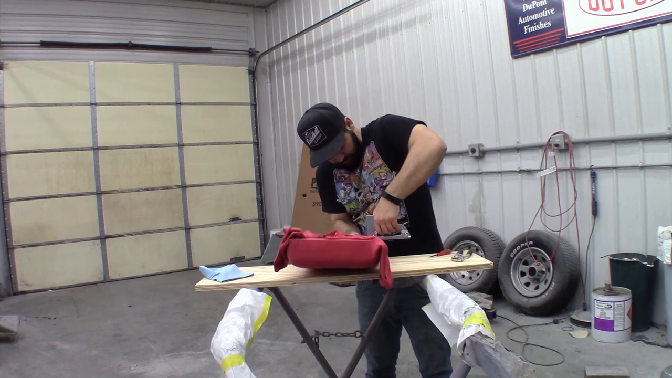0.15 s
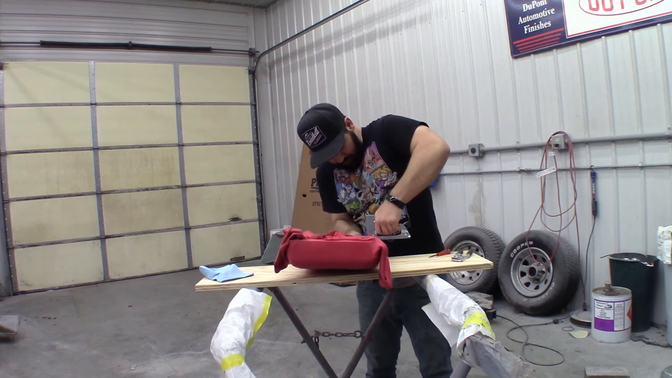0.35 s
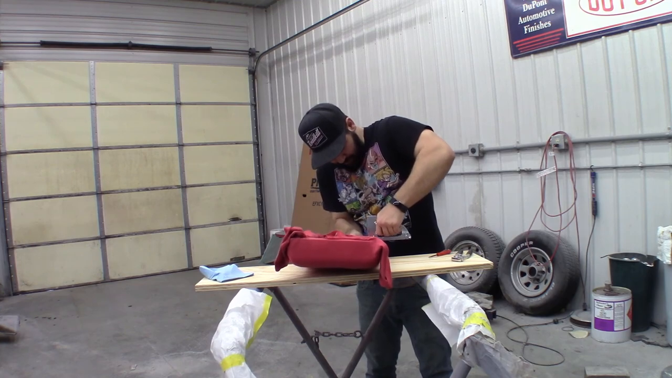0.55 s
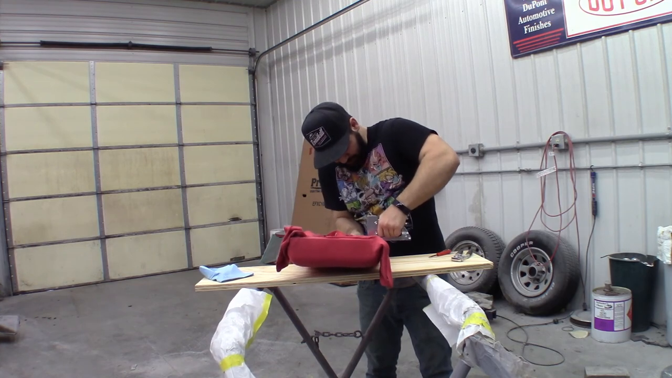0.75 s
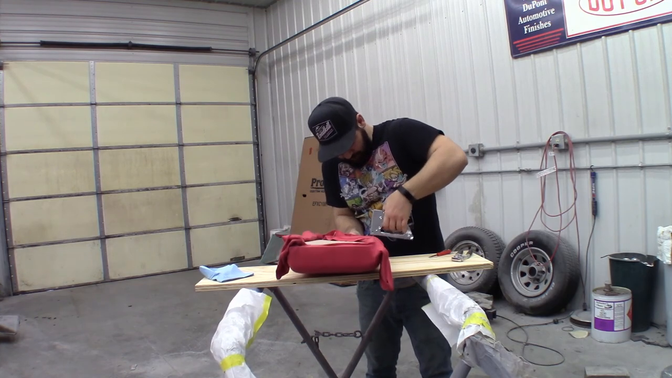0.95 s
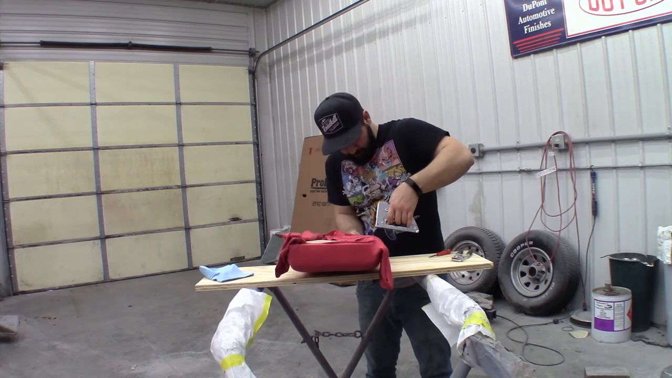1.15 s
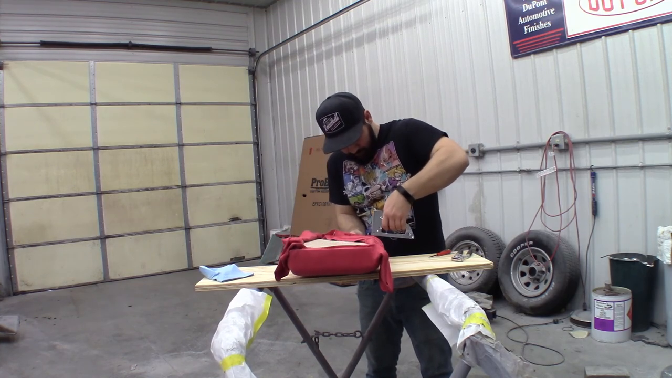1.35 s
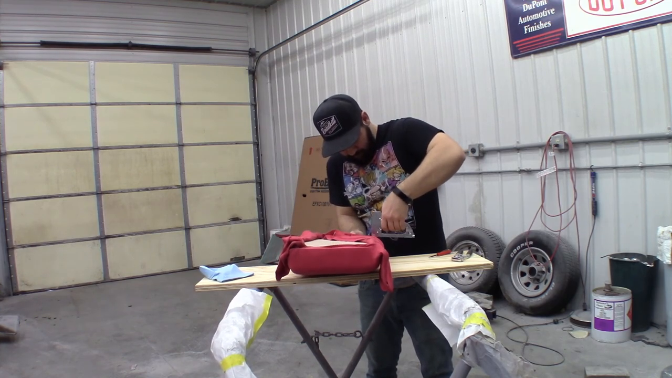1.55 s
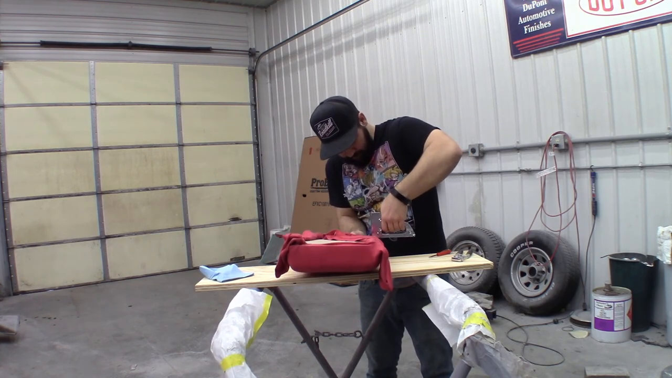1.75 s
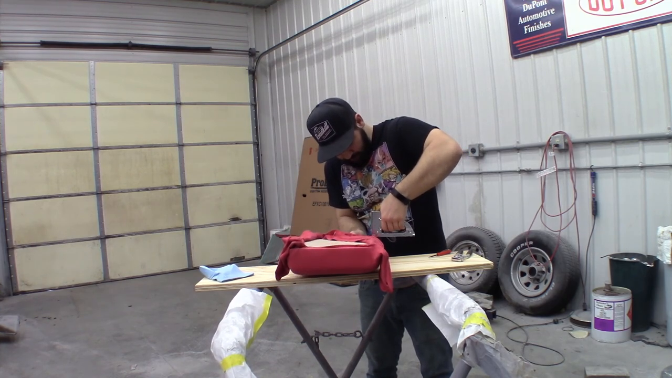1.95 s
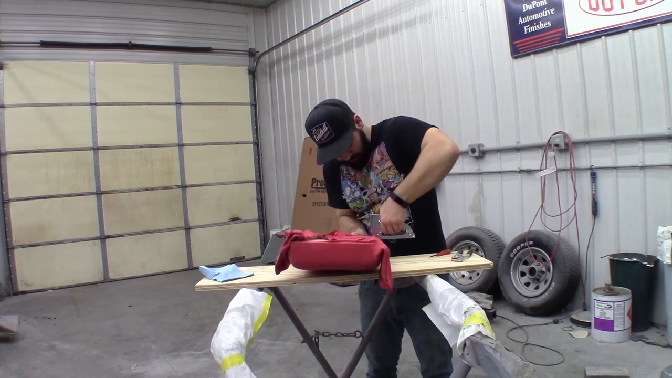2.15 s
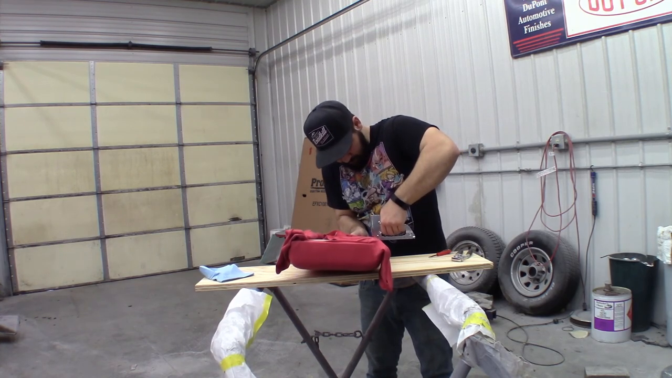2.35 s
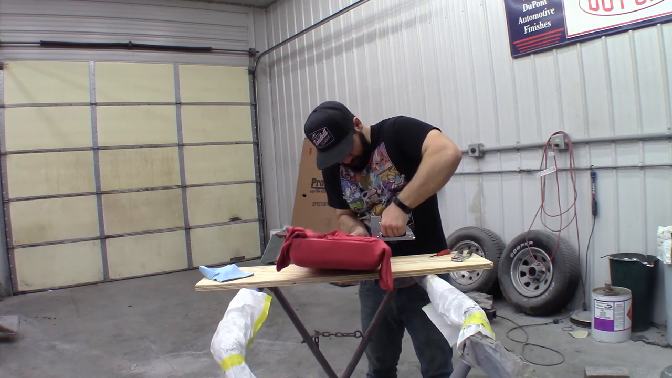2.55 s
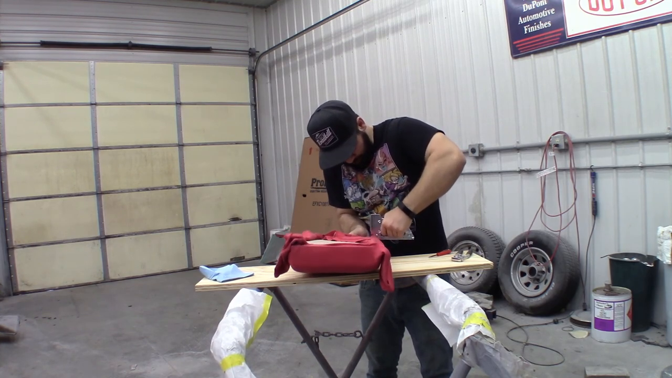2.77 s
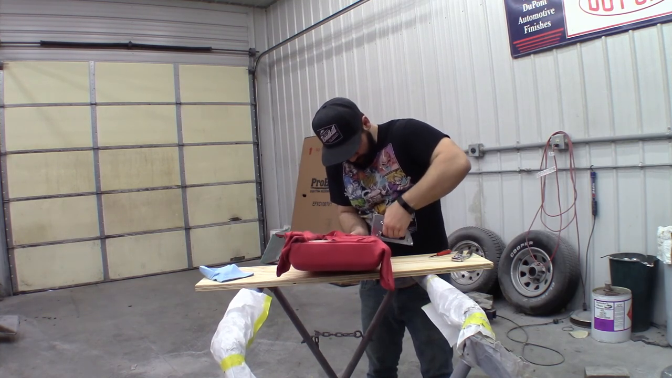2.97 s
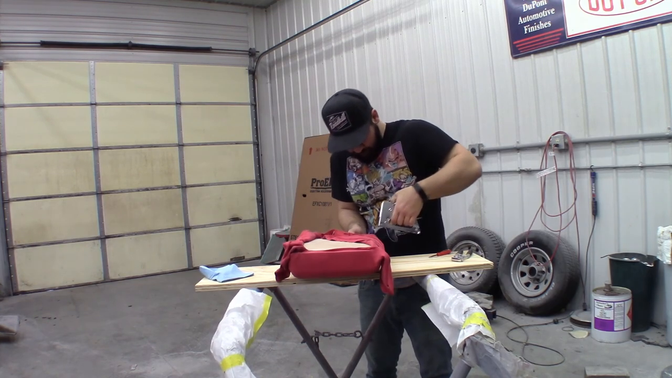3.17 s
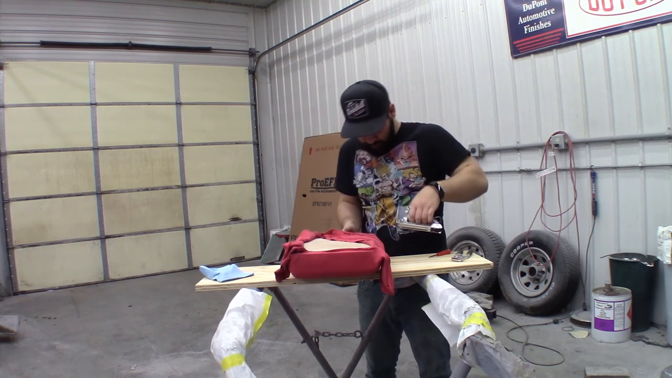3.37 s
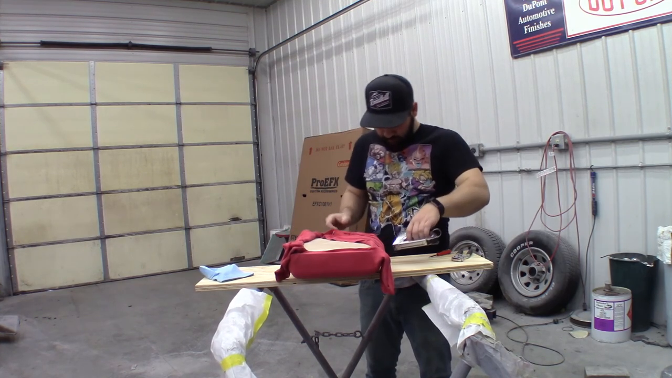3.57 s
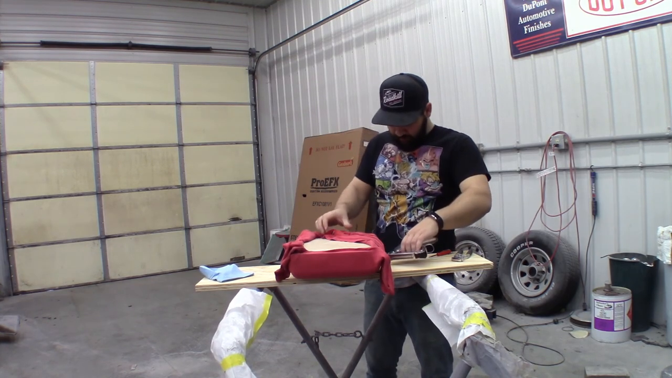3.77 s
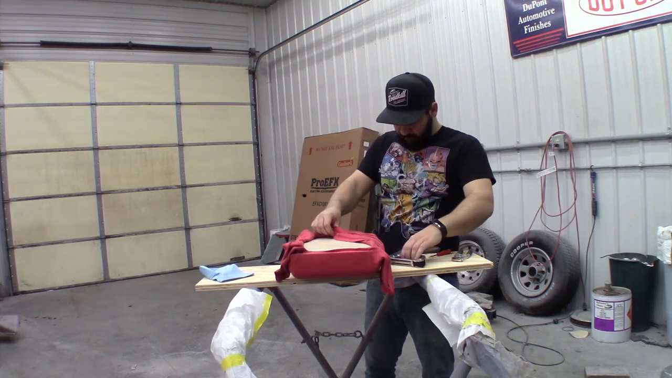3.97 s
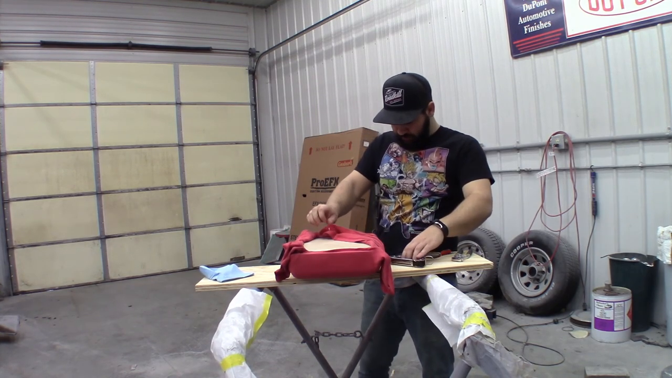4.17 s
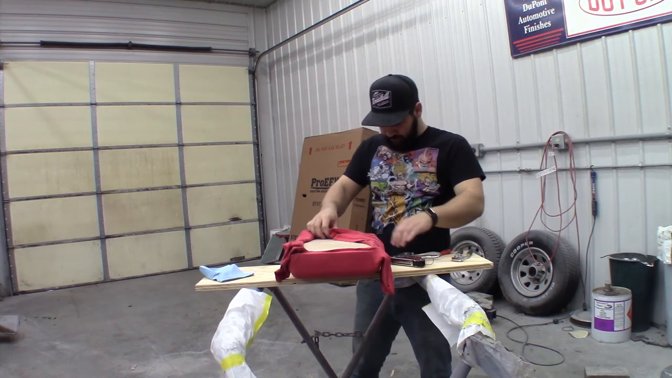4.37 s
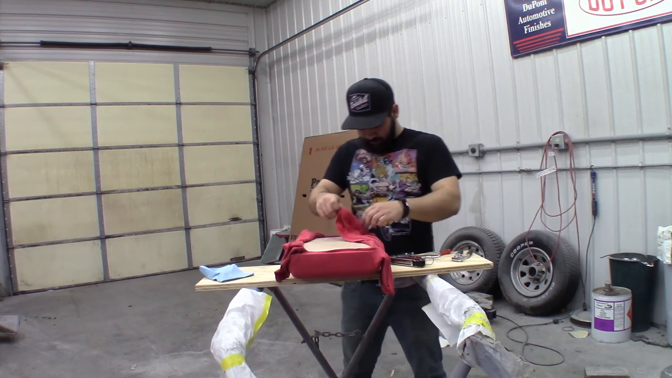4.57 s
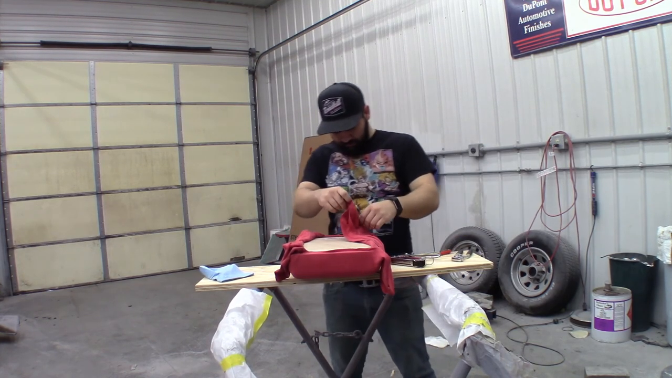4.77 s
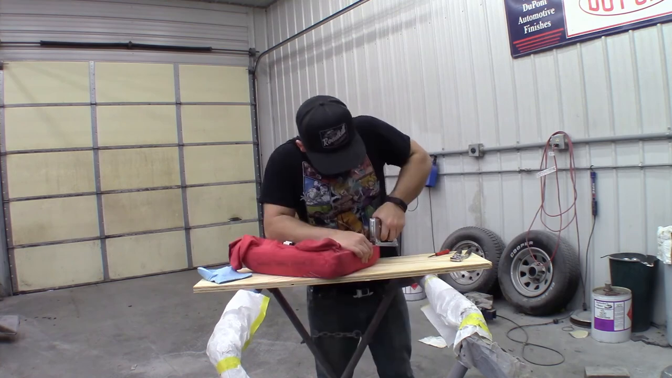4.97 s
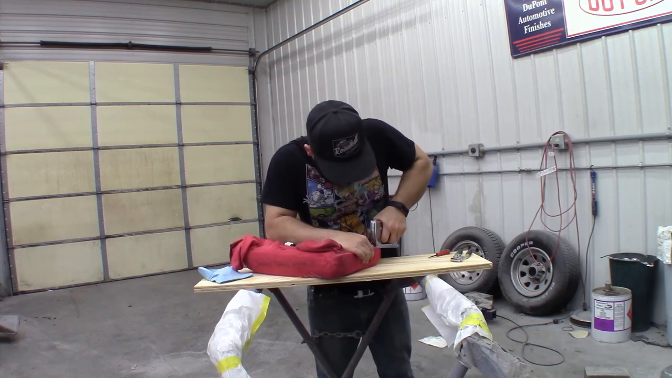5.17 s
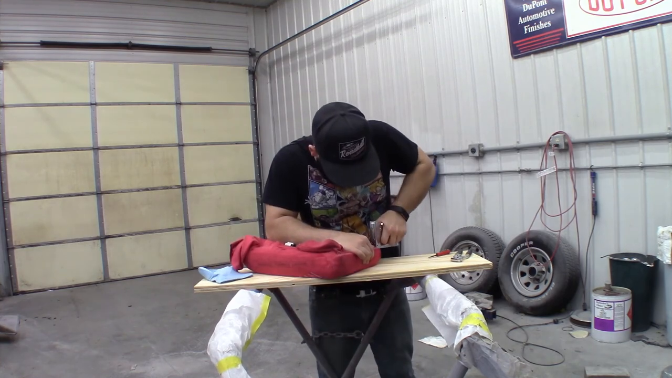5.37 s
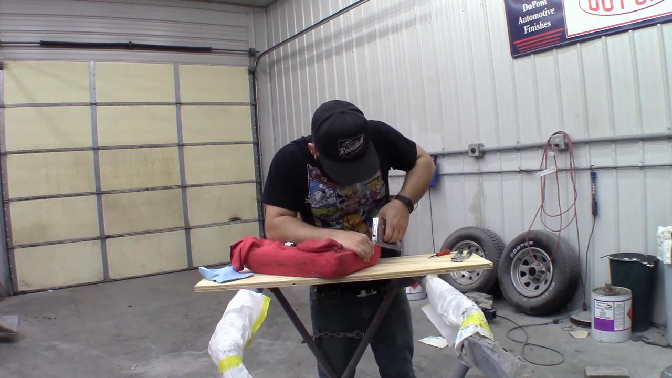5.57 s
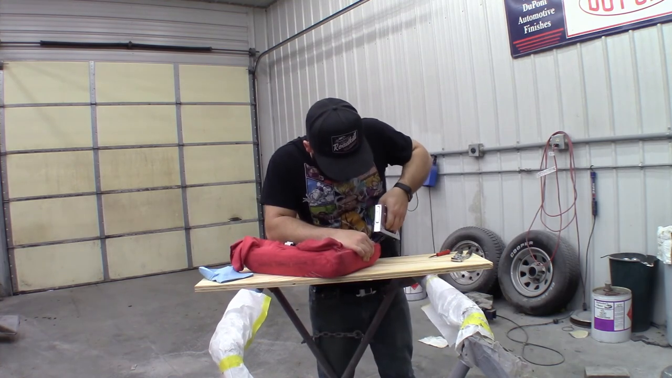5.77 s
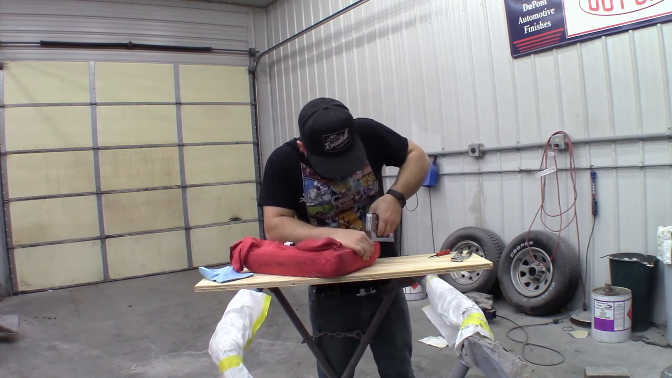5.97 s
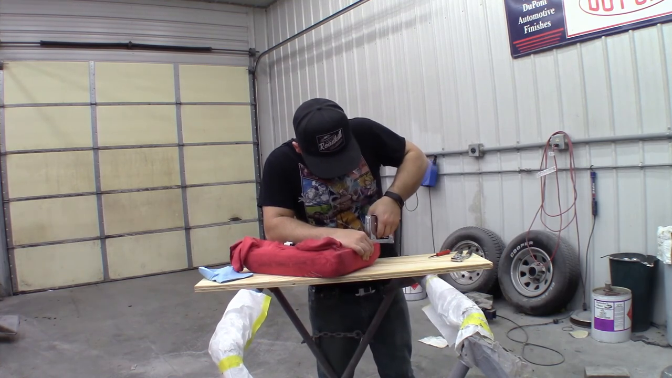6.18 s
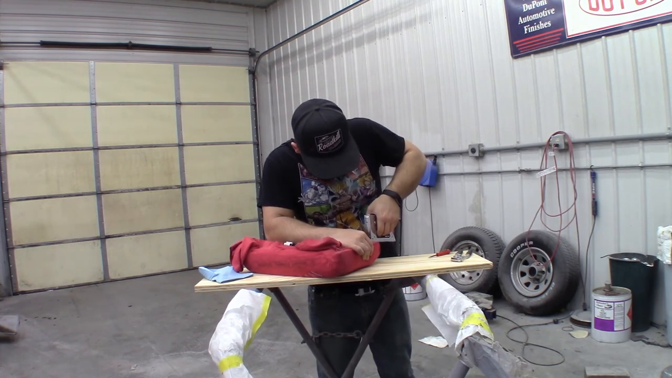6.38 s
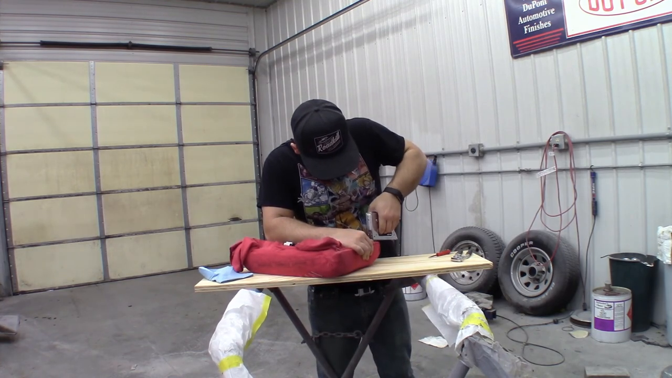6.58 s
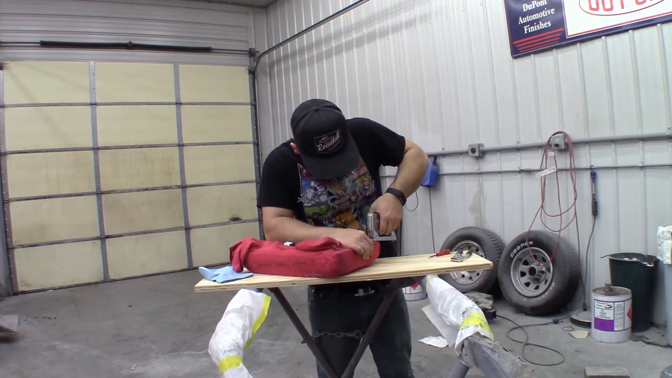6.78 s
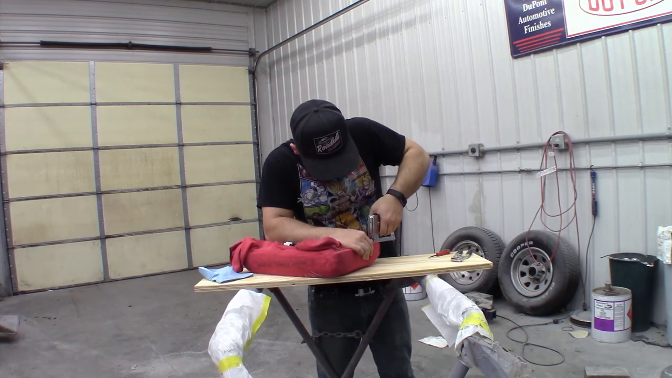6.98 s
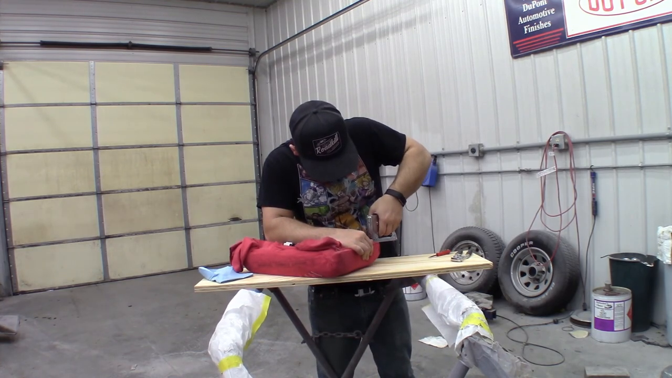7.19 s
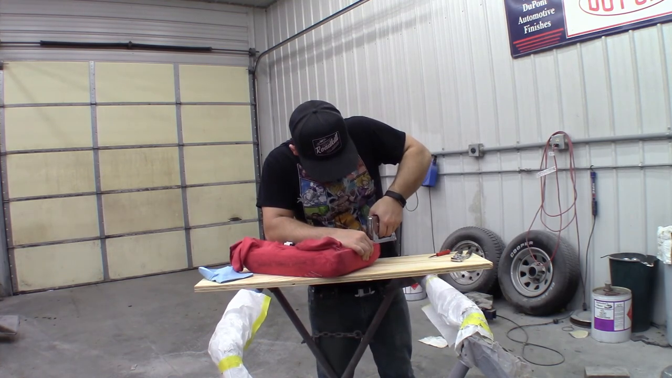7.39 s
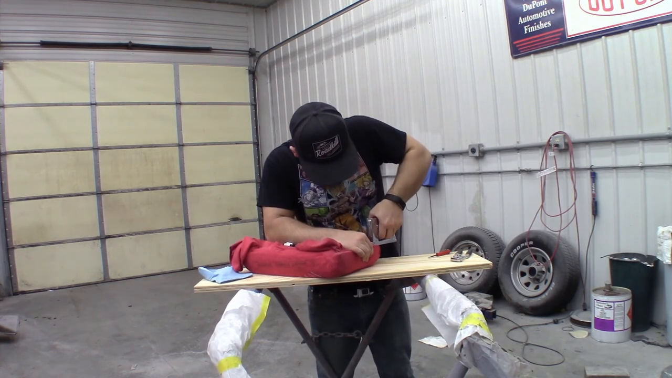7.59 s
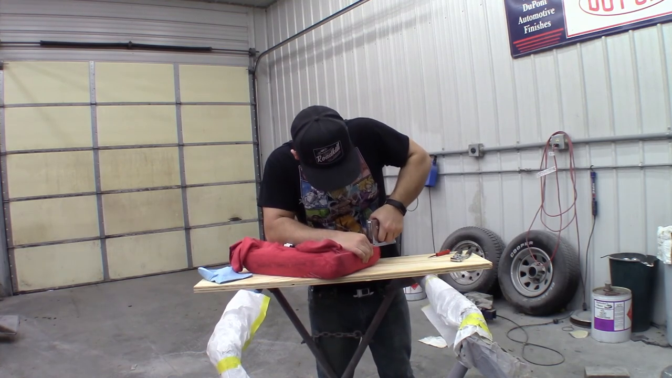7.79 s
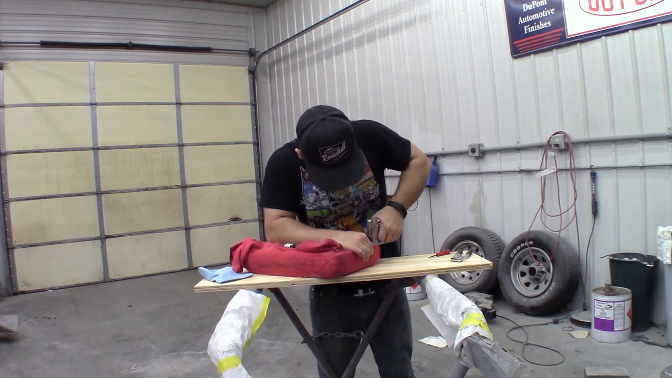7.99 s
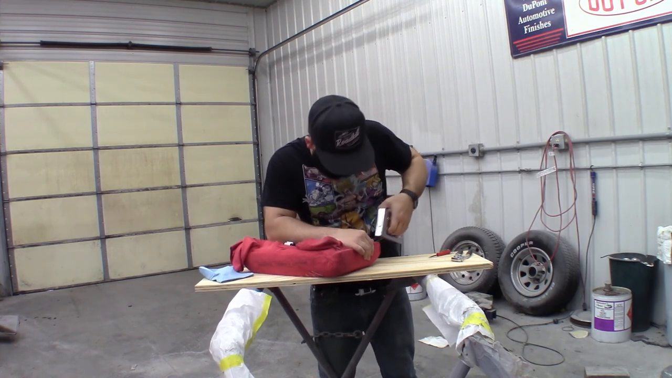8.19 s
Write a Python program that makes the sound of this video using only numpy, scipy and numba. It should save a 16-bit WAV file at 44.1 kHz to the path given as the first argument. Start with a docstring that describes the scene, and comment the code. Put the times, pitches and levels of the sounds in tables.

```python
"""A hand staple gun drives four staples through cloth into a wooden seat base, in a large, hard-walled
garage, a little right of the microphone. Each squeeze trips a catch, the driver slams home, the lever
clacks back and its spring pings. Midway the gun is laid on the plank table and the cloth is pulled over.
A fan hums in the background. The camera's stereo microphone feeds a limiter that ducks under each shot."""
import sys
import numpy as np
from scipy import signal
from scipy.fft import rfft, irfft
from scipy.io import wavfile
from scipy.ndimage import uniform_filter1d
from numba import njit

SR = 44100
rng = np.random.default_rng(int(sys.argv[2]) if len(sys.argv) > 2 else 0)


def inscribe(sig):
    """Save sig as 16-bit PCM at rate SR to the path in sys.argv[1].

    A 1-D sig is mono; a 2-D sig holds one channel per row.
    Samples are clipped to [-1, 1] before scaling.
    """
    pcm = np.round(np.clip(np.atleast_2d(sig).T, -1, 1) * 32767)
    wavfile.write(sys.argv[1], SR, pcm.astype(np.int16))


N = 363384
TIME = np.arange(N) / SR
HIT = 16384  # samples in one hit
HIT_S, HIT_HZ = np.arange(HIT) / SR, np.arange(1, HIT // 2 + 2) * SR / HIT
TOP_HZ = 15600

# The shots; the last two columns set the direct path past the hand to the microphone: start_s, level_db,
# thump_db, boom_db, bark_db, crack_db, resonance_depth, pitch_ratio, direct_db, treble_db
STAPLE_SHOTS = [(.624, 6, -4, 4, -2.5, 7, 1.1, 0.99, 1, -25),
                (2.7853, 6.5, 1.5, 0, 2, 4, 0.71, 0.96, -0.5, -11.5),
                (5.3608, 4.5, 5.5, -2, 3, 3.5, .2, .85, -3.5, 4.5),
                (7.922, 5, 9, 4.5, 4, 7, .56, 0.99, -4.5, 6.5)]
# Spectrum of the driver's blow: frequency_hz, level_db
BLOW_SPECTRUM = [(30, -38.5), (110, -35.5), (230, -18.5), (370, -20), (490, -1), (900, -4.5), (1300, 0),
                 (2000, -5.5), (2800, -4.5), (4200, -12), (7500, -14), (11000, -20), (16000, -34.5)]
# Resonances of the gun pressed on the seat: pitch_hz, width_hz, gain_db
GUN_ON_SEAT_MODES = [(586.6, 31, 5), (705, 42, -3), (810, 180, 8.5), (1020, 76, 7), (1415, 75, -8),
                     (1610, 200, 5.5), (1860, 89, -8), (2080, 220, 4.5), (2610, 110, 4.5), (3110, 250, 7),
                     (3700, 250, 1.5), (4520, 350, 7.5), (6030, 40, 6.5)]
# The lever's cycle around each shot: catch_s, catch_db, return_s, return_db, return_centre_hz, spring_db
LEVER_CYCLES = [(0.6005, -35.5, .933, -28, 5750, -23.5), (2.7474, -30.5, 3.07, -25, 4400, -20),
                (5.3433, -35.5, 5.6432, -20.5, 6535, -35), (7.9082, -34.5, 8.183, -26, 7000, -38.5)]
# Resonances of the steel lever and case: pitch_hz, width_hz, gain_db
CASE_MODES = [(2400, 150, 7), (3040, 70, 8), (4080, 70, 1.5), (4500, 70, 4.5), (5160, 71, 9), (5800, 69, 9),
              (6940, 100, 8), (7760, 70, 3.5), (7930, 53, 8), (8900, 130, 7), (10450, 88, 5),
              (12600, 120, 9.5)]
# Ring of the return spring: pitch_hz, level_db, t60_s
SPRING_PARTIALS = [(6750, -9, 0.061), (7100, -22, 0.028), (9200, -23.5, 0.037)]
# The spring brushes the case, then snaps free: delay_s, gain_db
SPRING_CONTACTS = [(.012, -7), (.0245, 0)]
# The gun is laid down and rocks: start_s, thud_db, centre_hz, length_s, resonance_depth, clack_db
TABLE_KNOCKS = [(3.902, -21.5, 400, 0.0092, 1.06, -45.5), (3.915, -18, 500, .017, 0.96, -45.5),
                (4.033, -28.5, 415, 0.0061, .9, -41.5), (4.071, -28.5, 590, .022, .8, -53.5),
                (4.233, -23.5, 493, 0.019, 0.67, -41.5), (4.41, -30, 608, 0.0029, 0.22, -45.5)]
# Resonances of the plank table: pitch_hz, width_hz, gain_db
TABLE_MODES = [(150, 20, 6.5), (261, 30, 12.5), (305, 25, 6), (393, 25, -7), (448, 9.3, 20),
               (515, 25, -13.5), (588, 27, 23.5), (736, 46, 9), (860, 70, -3), (997, 22, 16.5),
               (1140, 80, -8.5), (1351, 28, 11.5), (1610, 50, 7.5)]
# Ticks and scrapes of the case: start_s, level_db, centre_hz, width_octaves, length_s
GRIP_SHIFTS = [(0.207, -53.5, 5678, 0.42, 0.044), (1.584, -59, 7000, 1, .012),
               (1.681, -48, 2880, 0.18, 0.0025), (2.267, -52, 5300, 0.49, 0.02),
               (3.8764, -42, 1500, 0.57, 0.0049), (4.0445, -42.5, 9500, .7, .002),
               (5.179, -46.5, 2400, 0.62, 0.0077)]
# The nose meets the seat: start_s, level_db
NOSE_BUMPS = [(.082, -37), (.508, -39)]
# Pulls on the cloth: middle_s, level_db, half_length_s
CLOTH_PULLS = [(3.78, -62, .14), (4.5, -66.5, .18), (4.89, -62, 0.071), (5.27, -67.5, 0.077)]
# Hiss of the cloth: frequency_hz, relative_db
CLOTH_SPECTRUM = [(200, -11.0), (1500, 9.5), (6000, -2), (10000, -8.5), (16000, -18.5)]
# Rush of air from the fan: frequency_hz, relative_db
AIR_SPECTRUM = [(30, -17), (70, -8), (105, -12.5), (150, -9), (210, -1), (380, -1.5), (500, -8.5),
                (1000, -14), (2100, -17.5), (3500, -25.5), (8000, -33), (16000, -45.5)]
# Hum of the fan blades: pitch_hz, level_db
BLADE_TONES = [(204.6, -60), (258.4, -71), (350, -61), (409.1, -67)]
# Decay of the garage: frequency_hz, t60_s
TAIL_DECAY = [(100, 0.68), (250, 0.96), (500, 1.083), (1000, 1.3), (2800, 1.308), (4500, 1.06),
              (7000, 0.54), (11000, 0.41), (16000, 0.88)]
# Diffuse sound at the microphone: frequency_hz, level_db
TAIL_SPECTRUM = [(60, -45.5), (250, -33), (500, -37.5), (2500, -36.5), (6000, -34.5), (14000, -41)]
# Colour of the tail's side channel: frequency_hz, gain_db
SIDE_SPECTRUM = [(250, -12.0), (1000, -1), (4000, 1.5), (8000, 2.5), (13000, -5.0)]
# Echoes off the floor and nearest walls: delay_s, level_db
NEAR_ECHOES = [(.0075, -16), (.0215, -11.5), (.029, -16), (.056, -17)]


def staple_gun(catch_s, catch_db, start_s, level_db, thump_db, boom_db, bark_db, crack_db, depth, ratio):
    """The catch trips, then the driver hits staple and wood, coloured by where the nose sits."""
    out = np.zeros(N)
    add(out, catch_s, catch_db, steel_click(length_s=.0059, centre_hz=3650, octaves=.76))
    seat_and_plank = thump_db * bell(350, .35) + boom_db * bell(540, .38)
    bark_and_crack = bark_db * bell(950, .39) + crack_db * bell(7800, .47)
    ring = depth * peaks(GUN_ON_SEAT_MODES, ratio)
    colour_db = along(BLOW_SPECTRUM, HIT_HZ) + seat_and_plank + bark_and_crack + ring
    add(out, start_s, level_db, strike(colour_db, length_s=.0056))
    return out


def steel_click(length_s, centre_hz, octaves):
    """A contact rings the steel lever and case."""
    steel_db = peaks(CASE_MODES) + along([(9000, 4.5), (16000, -13)], HIT_HZ)
    return strike(band(centre_hz, octaves, skirt_db=10) + steel_db, length_s)


def lever(clack_s=.0037, bounce_s=.0041, bounce_db=-5, rub_s=.0035):
    """Let go, the lever clacks on its stop and bounces once; the return spring pings just after."""
    out = np.zeros(N)
    ring = sum(undb(db) * np.sin(2 * np.pi * hz * HIT_S) * np.exp(-np.log(1000) * HIT_S / t60_s)
               for hz, db, t60_s in SPRING_PARTIALS)
    for _, _, return_s, db, centre_hz, spring_db in LEVER_CYCLES:
        add(out, return_s, db, steel_click(clack_s, centre_hz, octaves=1))
        add(out, return_s + bounce_s, db + bounce_db, steel_click(clack_s, centre_hz, octaves=1))
        for delay_s, gain_db in SPRING_CONTACTS:
            ping = signal.fftconvolve(contact(rub_s), ring)[:HIT]
            add(out, return_s + delay_s, spring_db + gain_db, ping)
    return out


def plank_table(damped_octaves=.38, free_octaves=1.15):
    """Each knock is a thud of wood and a clack of steel; a resting hand damps and narrows the ring."""
    out = np.zeros(N)
    for start_s, thud_db, centre_hz, length_s, depth, clack_db in TABLE_KNOCKS:
        octaves = damped_octaves + (free_octaves - damped_octaves) * abs(depth) ** 3
        wood_db = band(centre_hz, octaves, skirt_db=15) + depth * peaks(TABLE_MODES)
        add(out, start_s, thud_db, strike(wood_db, length_s))
        add(out, start_s, clack_db, steel_click(length_s=.0054, centre_hz=2900, octaves=.43))
    return out


def handling():
    """The case ticks and scrapes as the grip shifts; the nose bumps dully against the seat."""
    out = np.zeros(N)
    for start_s, db, centre_hz, octaves, length_s in GRIP_SHIFTS:
        add(out, start_s, db, steel_click(length_s, centre_hz, octaves))
    for start_s, db in NOSE_BUMPS:
        add(out, start_s, db, strike(band(centre_hz=486, octaves=.4, skirt_db=20), length_s=.0013))
    return out


def cloth(grain_db=5):
    """Threads catch and slip: a faint grainy hiss that swells with each pull."""
    grain = np.tanh(unit(uniform_filter1d(rng.standard_normal(N), size=200)))
    hiss = unit(noise(CLOTH_SPECTRUM) * undb(grain_db * grain))
    return hiss * sum(undb(db) * np.exp(-((TIME - s) / half_s) ** 2) for s, db, half_s in CLOTH_PULLS)


def fan(air_mid_db=-52, air_side_db=-64.5, waver=.19):
    """Air rush and wavering blade tones in the background, as mid and side."""
    mid = undb(air_mid_db) * noise(AIR_SPECTRUM)
    knots_s = np.linspace(0, N / SR, 40)
    for hz, db in BLADE_TONES:
        swell, drift = (np.interp(TIME, knots_s, rng.standard_normal(len(knots_s))) for _ in range(2))
        amplitude = np.sqrt(2) * undb(db) * (1 + waver * swell)
        mid += amplitude * np.sin(2 * np.pi * hz * TIME + waver * drift)
    brighter_air = [(hz, db + 2.2 * np.log10(hz / 2000)) for hz, db in AIR_SPECTRUM]
    return np.array([mid, undb(air_side_db) * noise(brighter_air)])


def garage(direct_db, treble_db, onset_s=.0032, side_db=-16, far_s=.12, far_width_s=.035, far_db=1):
    """The path to the microphone, as mid and side: direct sound, near echoes, then a dense tail."""
    size = 65536
    t, hz = np.arange(size) / SR, np.arange(size // 2 + 1) * SR / size
    centres_hz = np.geomspace(100, TOP_HZ, 12)
    spectra, response = rfft(rng.standard_normal((2, size))), np.zeros((2, size))
    for centre_hz, share in zip(centres_hz, np.eye(len(centres_hz))):
        noise_band = irfft(spectra * along(np.c_[centres_hz, share], hz))
        decay = np.exp(-np.log(1000) * t / along(TAIL_DECAY, centre_hz))
        response += noise_band * undb(along(TAIL_SPECTRUM, centre_hz)) * decay
    response *= 1 - np.exp(-(t / onset_s) ** 2)
    # the door and far walls answer late, as a soft swell in the tail
    response *= undb(far_db * np.exp(-((t - far_s) / far_width_s) ** 2))
    # the microphone's two ports sit close together, so long waves reach both alike
    response[1] = irfft(rfft(response[1]) * undb(side_db + along(SIDE_SPECTRUM, hz)))
    direct = undb(direct_db) * (t == 0)
    treble = signal.lfilter(*signal.butter(1, 5000, "high", fs=SR), direct)
    response[0] += direct + (undb(treble_db) - 1) * treble
    for delay_s, db in NEAR_ECHOES:
        response[0, int(delay_s * SR)] += undb(db)
    return response


def contact(length_s, rise=.25, chatter_db=-19, chatter_lengths=2.1):
    """Two hard parts meet, then chatter briefly; the spectrum is even."""
    age = HIT_S / length_s
    attack = 1 - np.exp(-(age / rise) ** 2)
    shape = attack * (np.exp(-age ** 2) + undb(chatter_db) * np.exp(-age / chatter_lengths))
    force = rng.standard_normal(HIT) * shape
    for _ in range(5):  # flatten the spectrum, then restore the envelope
        force = irfft(np.exp(1j * np.angle(rfft(force))))
        force = force * shape / np.sqrt(np.abs(uniform_filter1d(force ** 2, size=90)) + 1e-12)
    return force


def strike(colour_db, length_s):
    """A contact rings a body with this response (causal, through the folded cepstrum)."""
    cepstrum = irfft(colour_db * np.log(10) / 20)
    cepstrum[1:HIT // 2] *= 2
    cepstrum[HIT // 2:] = 0
    return irfft(rfft(contact(length_s)) * np.exp(rfft(cepstrum)))


def add(track, start_s, level_db, hit):
    """Mix in a hit whose energy equals 5 ms at the given level."""
    start = int(start_s * SR)
    hit = hit * undb(level_db) * np.sqrt(.005 * SR / np.sum(hit ** 2))
    track[start:start + HIT] += hit[:N - start]


def undb(db):
    """Decibels to gain."""
    return 10 ** (np.asarray(db) / 20)


def unit(x):
    """Scale to rms 1."""
    return x / np.sqrt(np.mean(x ** 2))


def along(points, hz):
    """Read (frequency_hz, value) points on a log-frequency axis."""
    points_hz, values = np.transpose(points)
    return np.interp(np.log(np.maximum(hz, 1)), np.log(points_hz), values)


def bell(centre_hz, octaves):
    """A bell over frequency, 1 at its centre."""
    return np.exp(-.5 * (np.log2(HIT_HZ / centre_hz) / octaves) ** 2)


def band(centre_hz, octaves, skirt_db):
    """A broad resonance in dB, with skirts that keep falling."""
    return -skirt_db * np.log(1 + .5 * (np.log2(HIT_HZ / centre_hz) / octaves) ** 2)


def peaks(modes, pitch_ratio=1):
    """Narrow resonances and notches in dB."""
    return sum(db / (1 + ((HIT_HZ - hz * pitch_ratio) / width_hz) ** 2) for hz, width_hz, db in modes)


def noise(spectrum):
    """Steady noise with the given spectrum, rms 1."""
    gain = undb(along(spectrum, np.arange(N // 2 + 1) * SR / N))
    return unit(irfft(rfft(rng.standard_normal(N)) * gain, N))


@njit
def follow(x, attack, release):
    """Peak follower with separate rise and fall."""
    out, level = np.empty(len(x)), 0.
    for i in range(len(x)):
        level += (x[i] - level) * (attack if x[i] > level else release)
        out[i] = level
    return out


def scene(right_db=.56):
    """The work sounds through the garage, over the fan; the tail changes as the gun moves between shots."""
    small_sounds = lever() + handling() + plank_table() + cloth()
    sources = [(small_sounds, -.5, 3)]  # track, direct_db, treble_db; the hand does not shade these
    for (*shot, direct_db, treble_db), (catch_s, catch_db, *_) in zip(STAPLE_SHOTS, LEVER_CYCLES):
        sources.append((staple_gun(catch_s, catch_db, *shot), direct_db, treble_db))
    at_microphone = fan()
    for track, direct_db, treble_db in sources:
        at_microphone += signal.fftconvolve(track[None], garage(direct_db, treble_db), axes=1)[:, :N]
    mid, side = at_microphone
    return np.array([(mid + side) * undb(-right_db), (mid - side) * undb(right_db)])


def record(dry, limit_db=-6, attack_s=.0011, release_s=.027, low_cut_hz=90):
    """The camera's limiter ducks under each crack; first peaks clip; deep bass and top treble are cut."""
    envelope = follow(np.abs(dry).max(axis=0), 1 / (1 + attack_s * SR), 1 / (1 + release_s * SR))
    envelope = np.roll(envelope, -SR // 1000)  # it looks a millisecond ahead
    limited = np.clip(dry / np.maximum(envelope / undb(limit_db), 1), -1, 1)
    bass_cut = signal.lfilter(*signal.butter(2, low_cut_hz, "high", fs=SR), limited)
    return signal.sosfilt(signal.ellip(10, .2, 80, TOP_HZ, fs=SR, output="sos"), bass_cut)


dry = scene()
out = record(dry)
inscribe(out)
```